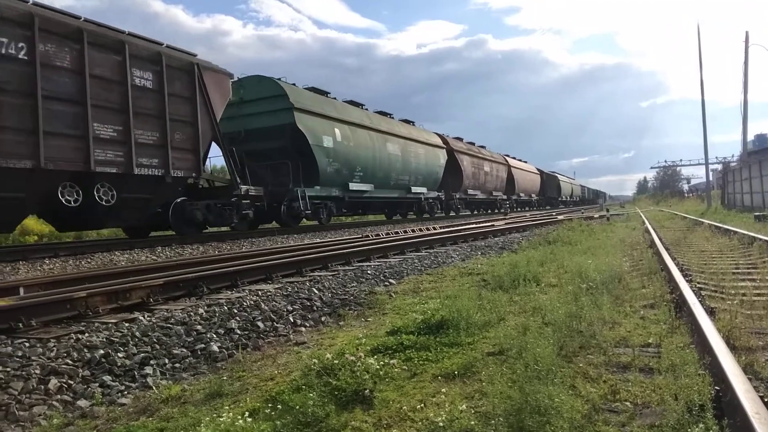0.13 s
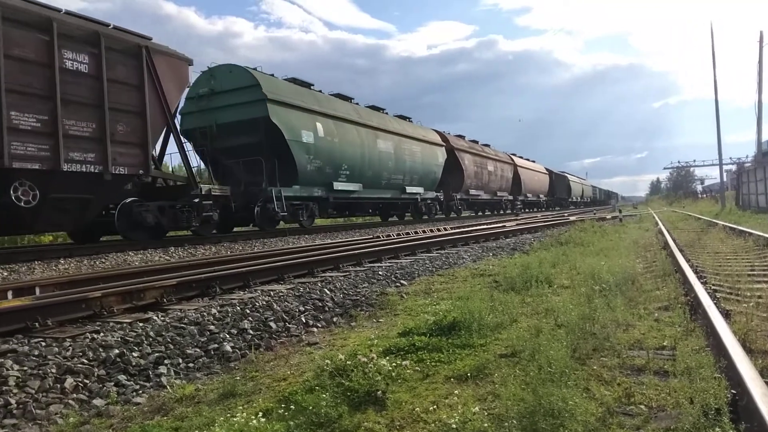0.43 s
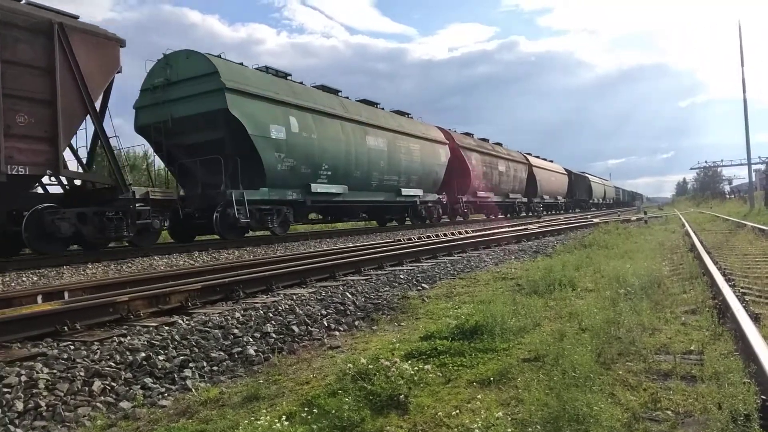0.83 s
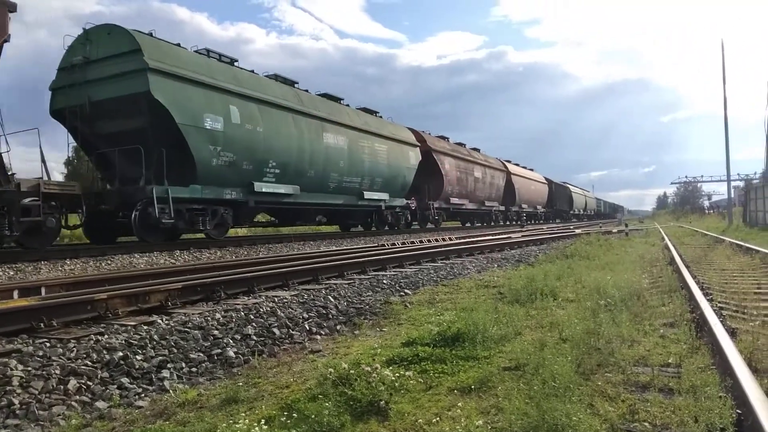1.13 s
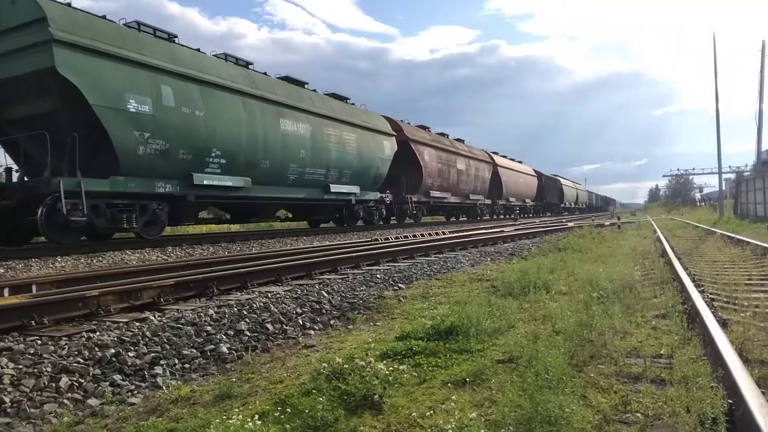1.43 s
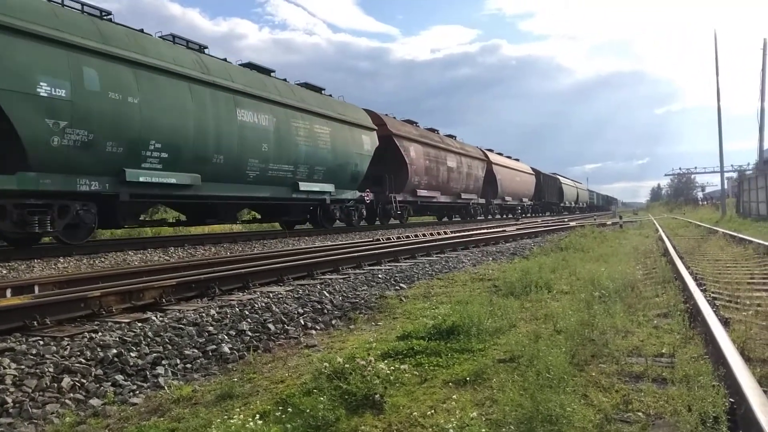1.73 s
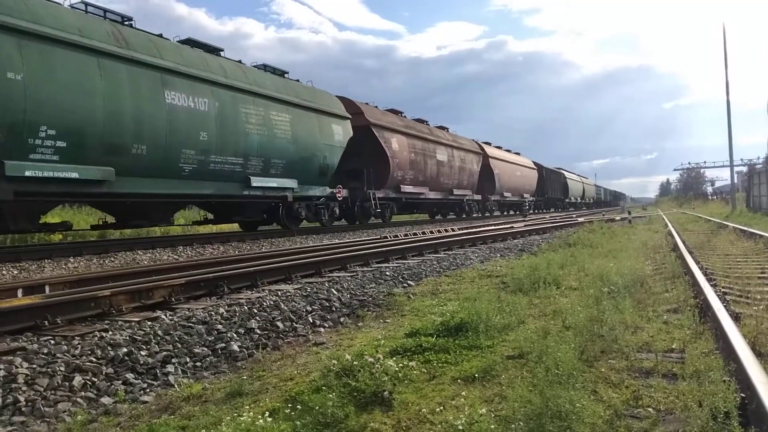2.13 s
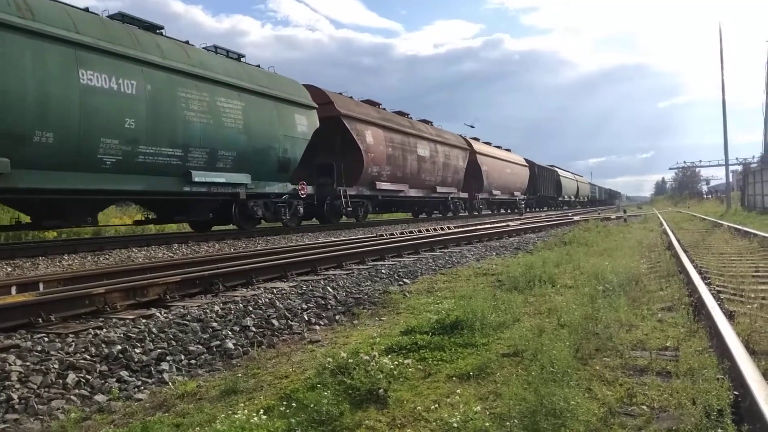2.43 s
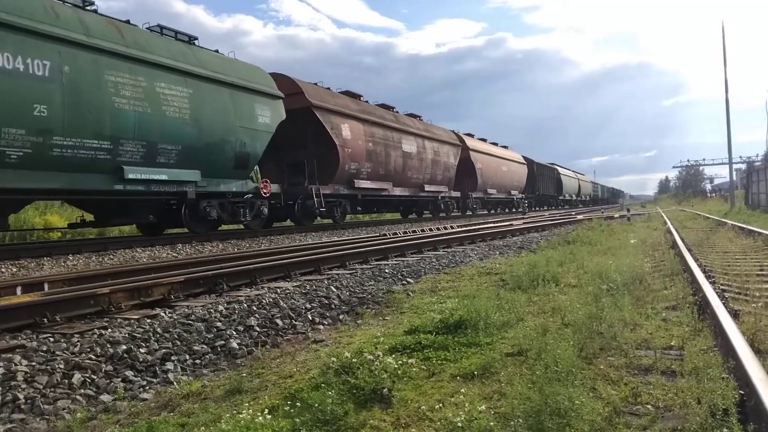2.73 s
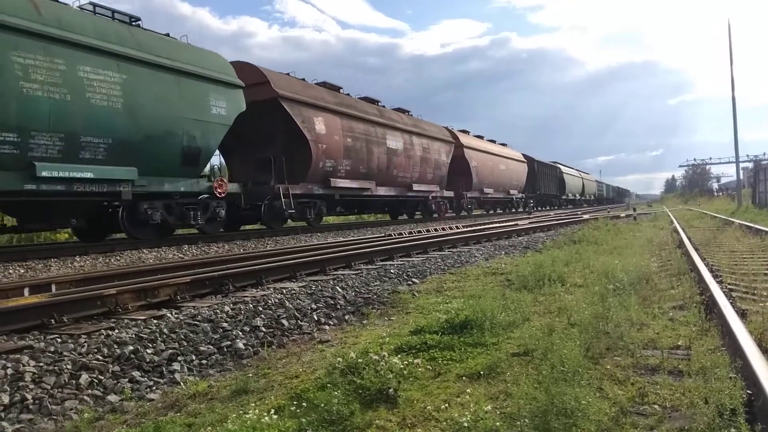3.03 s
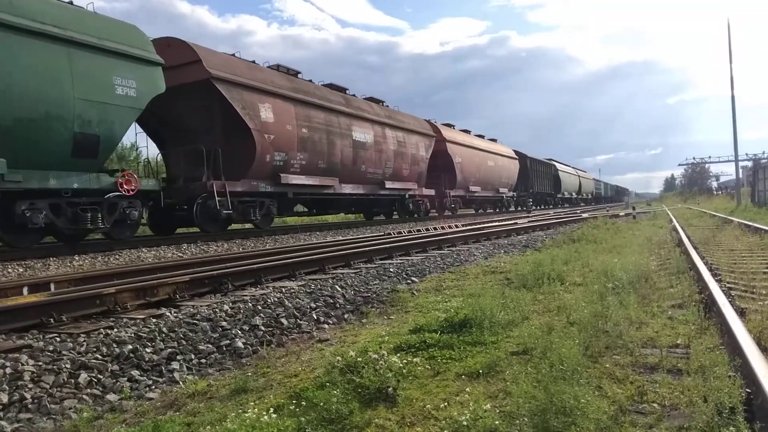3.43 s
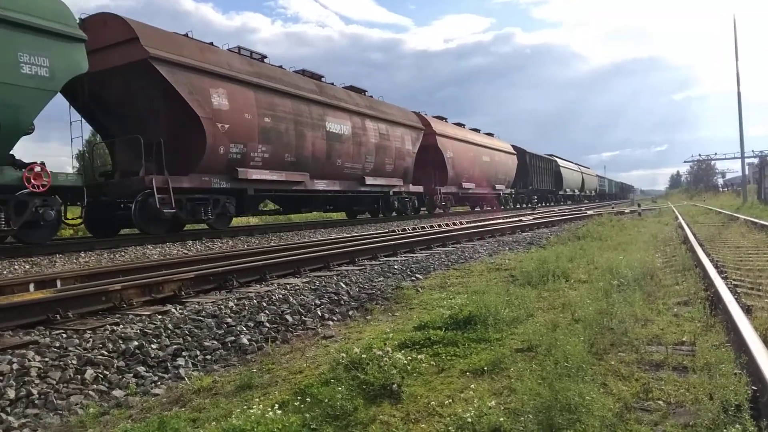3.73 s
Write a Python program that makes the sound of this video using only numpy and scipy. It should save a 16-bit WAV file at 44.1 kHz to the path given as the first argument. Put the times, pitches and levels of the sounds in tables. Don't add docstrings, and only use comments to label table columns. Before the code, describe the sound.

A freight train passes close by outdoors throughout, with uneven ground rumble, rolling hiss and a hollow wagon hum strongest in the first second. A flat wheel gives short rattling clacks roughly every half second from 0.3 to 3.7 s, mixed with sharp knocks. A thin squeal and bright scrape come around 2.1-2.4 s, another scrape near 2.7-3 s. Hiss and body roar ease slightly; close, wide handheld stereo.

```python
import sys
import numpy as np
from scipy import signal
from scipy.fft import rfft, irfft, next_fast_len
from scipy.io import wavfile

SR = 44100
rng = np.random.default_rng(int(sys.argv[2]) if len(sys.argv) > 2 else 0)


def gain_from_db(level_db):
    decades = np.asarray(level_db, float) / 20
    return 10 ** decades


def generate_wav(signal):
    frames = np.transpose(np.atleast_2d(signal))
    scaled = np.clip(frames, -1, 1) * 32767
    pcm = np.round(scaled).astype(np.int16)
    wavfile.write(sys.argv[1], SR, pcm)


N = 171108
M = next_fast_len(N)
T = np.arange(N) / SR
HZ = np.maximum(np.fft.rfftfreq(M, 1 / SR), 1)
OCTAVES = np.log2(HZ)


def rms_one(x):
    return x / np.sqrt(np.mean(x ** 2) + 1e-20)


def at_hz(points):
    hz, values = np.array(points).T
    return np.interp(OCTAVES, np.log2(hz), values)


def sound(spectrum):
    return irfft(spectrum, M)[..., :N]


def drift_db(rate_hz, spread_db):
    pole = np.exp(-2 * np.pi * rate_hz * 40 / SR)
    noise = rng.standard_normal(N // 40 + 2002)
    slow = signal.lfilter([1], [1, -2 * pole, pole ** 2], noise)[2000:]
    gain = gain_from_db(spread_db * rms_one(slow - slow.mean()))
    return np.interp(np.arange(N) / 40, np.arange(len(slow)), gain)


def wander(rate_hz):
    return np.log(drift_db(rate_hz, 8.686))


# frequency in Hz, likeness from 0 to 1.
PORT_LIKENESS = [(60, .93), (200, .97), (350, .94), (550, .55), (1000, .45), (1700, .62), (2200, .2),
                 (3500, .33), (6000, .15)]


def wide(white=None):
    if white is None:
        white = rng.standard_normal((2, N))
    mid, side = rfft(white, M)
    alike = np.clip(at_hz(PORT_LIKENESS), 0, 1)
    return np.sqrt(1 + alike) * mid + np.sqrt(1 - alike) * side * [[1], [-1]]


def patchy(spectrum, shared_db, own_db, rate):
    low, high = np.log2(spectrum[0][0]), np.log2(spectrum[-1][0])
    step = 2 / 3
    noise = wide() * gain_from_db(at_hz(spectrum)) * (OCTAVES > low)
    out = 0
    for k in range(int((high - low) / step + 1.5)):
        window = np.maximum(1 - np.abs(OCTAVES - low - k * step) / step, 0)
        out = out + drift_db(rate, own_db) * sound(noise * window)
    return rms_one(out * drift_db(5.9, shared_db))


def resonance(noise, hz, width_hz):
    return rms_one(sound(noise / (1 + (2 * (HZ - hz) / width_hz) ** 2)))


def hum(level_db, hz):
    phase = 2 * np.pi * np.cumsum(hz * (1 + 0.008 * wander(8.0))) / SR
    return np.sqrt(2) * gain_from_db(level_db) * drift_db(9.1, 1.5) * np.sin(phase)


# frequency in Hz, level in dB per Hz.
GROUND_COLOUR = [(12, -18), (25, -7.5), (50, 1), (62, -1.5), (80, 4), (110, -1.5), (150, -12.5), (250, -27)]
BODY_COLOUR = [(80, -10.5), (150, -0.5), (200, -4), (240, -2), (330, -8.5), (420, -11.5), (800, -13.5),
               (1800, -34.5)]
# frequency in Hz, width in Hz, level in dB, share of the hum's swing.
HOPPER_MODES = [(343, 7.4, -13.5, 0.47), (806, 46, -22, 1)]
# time in seconds, level in dB.
HUM_LEVEL = [(0.0, -21), (0.3, -29), (0.34, -21), (0.7, -29.5), (0.78, -21.5), (1.03, -25.5), (1.08, -36),
             (1.17, -25), (1.34, -23.5), (1.41, -32), (1.58, -28.5), (1.69, -36), (1.78, -27), (1.92, -33),
             (2.02, -29.5), (2.1, -34.5), (3.87, -32.5), (3.88, -38)]
OVERTONE_LEVEL = [(0, -19.5), (.17, -31.5), (.27, -22), (.35, -28), (.42, -25.5), (.58, -34), (.73, -22),
                  (.8, -38), (.87, -24), (.98, -44), (1.03, -26), (1.4, -28), (1.46, -34.5), (2.95, -42.5),
                  (3.01, -31), (3.38, -40), (3.5, -33), (3.88, -43.5)]


def rumble(ground_db, body_db):
    hum_hz = 134.8
    hum_db = np.interp(T, *np.transpose(HUM_LEVEL))
    overtone_db = np.interp(T, *np.transpose(OVERTONE_LEVEL))
    mean_db = hum_db.mean()
    noise = wide()
    out = hum(hum_db, hum_hz) + hum(overtone_db, 2 * hum_hz)
    for hz, width_hz, db, share in HOPPER_MODES:
        mode_db = db + mean_db + share * (hum_db - mean_db)
        out = out + gain_from_db(mode_db) * resonance(noise, hz, width_hz)
    ground = patchy(GROUND_COLOUR, shared_db=0.8, own_db=1.2, rate=6.0)
    body = patchy(BODY_COLOUR, shared_db=0.45, own_db=0.8, rate=9.9)
    return out + gain_from_db(ground_db) * ground + gain_from_db(body_db + 4.5) * body


# frequency in Hz, level in dB per Hz.
ROLLING_COLOUR = [(500, -19), (1200, 1), (1900, -3.5), (2300, 0.5), (4000, -5), (7200, -11), (9500, -21.5),
                  (16000, -37)]
# frequency in Hz, width in Hz, level in dB against the hiss.
WHEEL_MODES = [(1675, 80, -15), (2100, 110, -15), (2420, 150, -15), (2750, 120, -18), (5110, 60, -28),
               (5580, 110, -20), (6690, 70, -28), (6990, 100, -28)]


def rolling(level_db):
    noise = wide()
    hiss = patchy(ROLLING_COLOUR, shared_db=0.15, own_db=1.35, rate=14.4)
    for hz, width_hz, db in WHEEL_MODES:
        hiss = hiss + gain_from_db(db) * drift_db(9.7, 3.47) * resonance(noise, hz, width_hz)
    return gain_from_db(level_db) * hiss


# time in seconds, low level in dB, high level in dB, length in seconds.
FLAT_BLOWS = [
    (0.321, -22.5, -25.5, 0.016),
    (0.814, -24.5, -30.5, 0.024),
    (1.292, -21.5, -27.5, 0.021),
    (1.655, -35, -31.5, 0.021),
    (1.777, -21, -28, 0.013),
    (2.227, -23, -28.5, 0.043),
    (2.742, -26, -26.5, 0.019),
    (3.228, -28, -27.5, 0.02),
    (3.712, -21, -26.5, 0.015),
    (0.564, -26.5, -36, 0.023),
]
# frequency in Hz, level in dB per Hz.
BLOW_LOW = [(300, -2), (700, -2.5), (1500, 0), (2200, 2.5), (3200, 2), (4500, -12), (8000, -31.5)]
BLOW_HIGH = [(2000, -44), (4000, 5), (5500, 3.5), (7000, 5.5), (8500, -6), (11000, -49)]
BLOW_TOP = [(6000, -22), (8500, 0), (11000, 4), (16000, -34)]


def clacks():
    knocks_per_s, tail = 2500, 1.9
    peakedness = 1.31
    struck = rng.random((2, N)) < knocks_per_s / SR
    strength = gain_from_db(3.5 * np.minimum(rng.exponential(1, N), 3))
    knocks = struck * strength * rng.choice([-1, 1], (2, N))
    rattle = wide(rms_one(knocks) + 0.47 * rng.standard_normal((2, N)))
    s, low_db, high_db, length = np.transpose(FLAT_BLOWS)
    top_db = high_db - 12.5 - 4 * s
    out = 0
    for levels_db, colour in [(low_db, BLOW_LOW), (high_db, BLOW_HIGH), (top_db, BLOW_TOP)]:
        swell = np.zeros(N)
        for at, db, size in zip(s, levels_db, length):
            near = slice(max(int((at - 0.2) * SR), 0), int((at + 0.3) * SR))
            late = (T[near] - at) / size
            away = np.where(late > 0, late / tail, -late)
            swell[near] += gain_from_db(2 * db) * np.exp(-away ** peakedness)
        out = out + np.sqrt(swell) * rms_one(sound(rattle * gain_from_db(at_hz(colour))))
    return out


# time in seconds, peak in dB.
KNOCKS = [(0.1461, -15), (0.3247, -10), (0.6833, -18), (0.7228, -18), (0.8011, -12), (1.7659, -15),
          (1.7659, -5), (1.8692, -15), (2.394, -14), (2.4848, -18), (2.7462, -10), (3.2091, -12),
          (3.708, -11)]


def ticks():
    s, db = np.transpose(KNOCKS)
    clicks = np.zeros(N)
    clicks[(s * SR).astype(int)] = gain_from_db(db + 3)
    band = signal.butter(2, [2000, 7000], "band", fs=SR, output="sos")
    return signal.sosfilt(band, clicks + 1e-18)


# start in seconds, hold in seconds, release in seconds per 10 dB, level in dB.
FLANGE_RUBS = [
    (2.12, .25, .03, -37),
    (2.71, .15, .3, -34.5),
    (.02, .25, .05, -50),
    (.93, .02, .02, -47),
    (1.52, .03, .02, -48),
    (1.64, .05, .02, -47),
    (1.865, .03, .02, -49),
    (2.4, .08, .05, -52),
]
# frequency in Hz, level in dB per Hz.
SCRAPE_COLOUR = [(3000, -31), (6000, 6.5), (8500, 6.5), (11000, 8.5), (13000, -5), (16000, -5)]
# frequency in Hz, width in Hz, level in dB against the scrape.
RIM_MODES = [(6700, 25, -18), (7870, 30, -19), (8950, 30, -22), (9280, 30, -21), (9520, 30, -20),
             (10150, 30, -23), (10470, 40, -25), (11080, 40, -25), (12300, 200, -19), (13450, 200, -27),
             (14500, 100, -28)]


def scrapes():
    rise = 0.05
    gain = np.zeros(N)
    for s, hold, fall, db in FLANGE_RUBS:
        corners = [s - rise, s, s + hold, s + hold + 6 * fall]
        gain += gain_from_db(db + np.interp(T, corners, [-30, 0, 0, -60])) * (T > s - rise)
    noise = wide()
    hiss = patchy(SCRAPE_COLOUR, shared_db=0.7, own_db=1.2, rate=15.0)
    for hz, width_hz, db in RIM_MODES:
        hiss = hiss + gain_from_db(db) * drift_db(8.0, 3.5) * resonance(noise, hz, width_hz)
    return gain_from_db(2) * gain * hiss


def around(s, rise, fall):
    return np.arange(max(int((s - 4 * rise) * SR), 0), min(int((s + 4 * fall) * SR), N))


def swell_db(near, s, rise, fall):
    return -10 * np.where(T[near] < s, (s - T[near]) / rise, (T[near] - s) / fall)


# peak time in seconds,
# frequency in Hz, level in dB, rise and fall in seconds per 10 dB.
SQUEALS = [(2.137, 3049, -22, .022, .055), (2.195, 3060, -27, .015, .02), (2.243, 3055, -27, .02, .008),
           (2.28, 3050, -27, .015, .015), (2.36, 3050, -35, .015, .015), (2.385, 3050, -37, .01, .04),
           (2.15, 6102, -34, .04, .15), (2.18, 15133, -38, .04, .05), (2.17, 7623, -47, .04, .08),
           (2.398, 2890, -27, .006, .014), (2.24, 2760, -33, .01, .012), (2.76, 3039, -34, .03, .1),
           (.332, 6430, -31, .01, .015), (3.735, 625, -26, .012, .035), (3.71, 1170, -31, .01, .02),
           (1.655, 4950, -34, .015, .015), (.13, 12070, -52, .02, .02), (.17, 15700, -57, .04, .02),
           (.51, 15700, -57, .03, .02), (1.72, 269, -22, .07, .07), (1.93, 270, -22, .04, .12),
           (2.19, 269, -26, .06, .06), (2.58, 268, -27, .04, .04)]


def sings():
    out = np.zeros(N)
    wobble, pitch = drift_db(25.0, 1.8), wander(30.0)
    shifts = rng.integers(0, N, (len(SQUEALS), 2))
    for (s, hz, db, rise, fall), shift in zip(SQUEALS, shifts):
        near = around(s, rise, fall)
        phase = 2 * np.pi * np.cumsum(hz * (1 + 0.0015 * pitch[(near + shift[0]) % N])) / SR
        level = np.sqrt(2) * gain_from_db(db + swell_db(near, s, rise, fall))
        out[near] += level * wobble[(near + shift[1]) % N] * np.sin(phase)
    return out


# peak time in seconds, frequency in Hz, level in dB,
# rise and fall in seconds per 10 dB.
GRAINY_RUBS = [(2.95, 5115, -42, .1, .2), (.3, 6985, -38, .08, .15), (.15, 6985, -39, .03, .08),
               (.28, 10850, -52, .25, .05), (.94, 10850, -48, .02, .02), (1.54, 10850, -46, .04, .03),
               (1.67, 10800, -47, .03, .03), (1.79, 10850, -46, .03, .04), (1.875, 10800, -48, .02, .03),
               (1.97, 5570, -36, .05, .04), (1.77, 5570, -34, .02, .08), (1.66, 5570, -37, .03, .05),
               (1.51, 5500, -39, .02, .05), (2.5, 5500, -38, .03, .05), (1.67, 13500, -52, .04, .02),
               (1.67, 14500, -54, .03, .02), (1.286, 2150, -22, .015, .025), (1.292, 2950, -27, .025, .015),
               (1.78, 2300, -25, .012, .02), (2.8, 6700, -36, .04, .1), (2.17, 13450, -52, .04, .06),
               (2.16, 9500, -48, .02, .1), (3.03, 15000, -56, .1, .05), (2.8, 13450, -54, .1, .2),
               (2.23, 2130, -27, .02, .03), (.4, 5570, -38, .06, .06), (.7, 1680, -33, .05, .04),
               (3.2, 2250, -31, .05, .04)]


def smears():
    out = np.zeros((2, N))
    grain = wander(65)
    shifts = rng.integers(0, N, (len(GRAINY_RUBS), 4))
    for (s, hz, db, rise, fall), shift in zip(GRAINY_RUBS, shifts):
        near = around(s, rise, fall)
        a, b, c, d = grain[(near + shift[:, None]) % N]
        phase = 2 * np.pi * hz * T[near]
        cos, sin = np.cos(phase), np.sin(phase)
        shared = a * cos + b * sin
        own = 0.65 * (c * cos + d * sin) * [[1], [-1]]
        out[:, near] += gain_from_db(db + swell_db(near, s, rise, fall)) * (shared + own)
    return out


# time in seconds, then ground rumble, rolling
# and wagon body levels in dB.
PASSING_BOGIES = [(0.0, -24.5, -24, -26), (0.18, -22.5, -24.5, -28), (0.6, -23, -26, -27),
                  (0.7, -22.5, -27, -28.5), (1.04, -26.5, -25, -29.5), (1.26, -22.5, -27.5, -31),
                  (1.53, -25, -27.5, -31), (1.76, -20, -26.5, -31.5), (1.93, -26.5, -26, -31.5),
                  (2.19, -25.5, -30.5, -34.5), (2.56, -22, -28.5, -33.5), (2.88, -23, -28.5, -35),
                  (3.24, -27.5, -30, -35), (3.61, -24, -30, -34), (3.88, -28.5, -29.5, -32.5)]


def scene():
    s, *columns = np.transpose(PASSING_BOGIES)
    ground_db, rolling_db, body_db = [np.interp(T, s, column) for column in columns]
    train = rumble(ground_db, body_db) + rolling(rolling_db)
    return train + clacks() + ticks() + scrapes() + sings() + smears()


def low_pass(x):
    return signal.sosfilt(signal.butter(12, 15790, fs=SR, output="sos"), x)


# frequency in Hz, gain in dB.
LEFT_COLOUR = [(500, 1), (2000, 4), (4000, 2), (7000, 8), (9000, -2.5), (11000, -17.5), (13000, -0.5),
               (15500, 2.5)]
RIGHT_COLOUR = [(500, 2), (2000, 1), (4000, -2.5), (7000, -12.5), (9000, -7), (11000, 4.5), (13000, -6.5),
                (15500, -4)]


def record(dry):
    left_lag_s, peak_limit, cutoff_hz = 0.00036, 0.95, 15790
    colour = gain_from_db(np.array([at_hz(LEFT_COLOUR), at_hz(RIGHT_COLOUR)]))
    lag = np.exp(-2j * np.pi * HZ * [[left_lag_s], [0]])
    ports = sound(rfft(dry, M) * colour * lag)
    rounded = peak_limit * np.tanh(ports / peak_limit)
    mix = sound(rfft(rounded, M) * (HZ < cutoff_hz))
    return low_pass(mix)


dry = scene()
out = record(dry)
generate_wav(out)
```